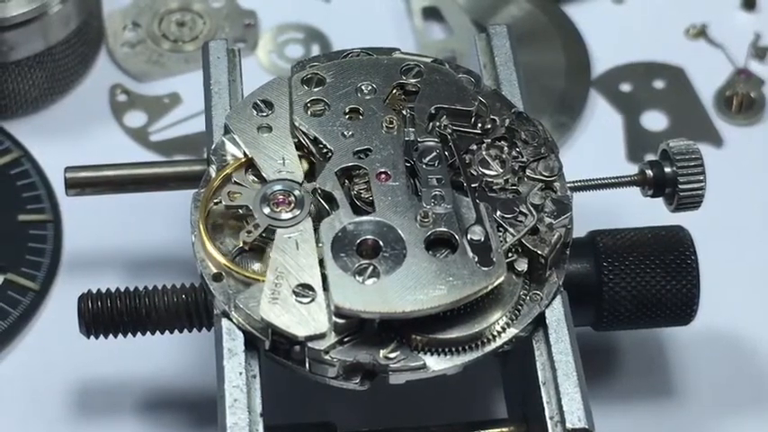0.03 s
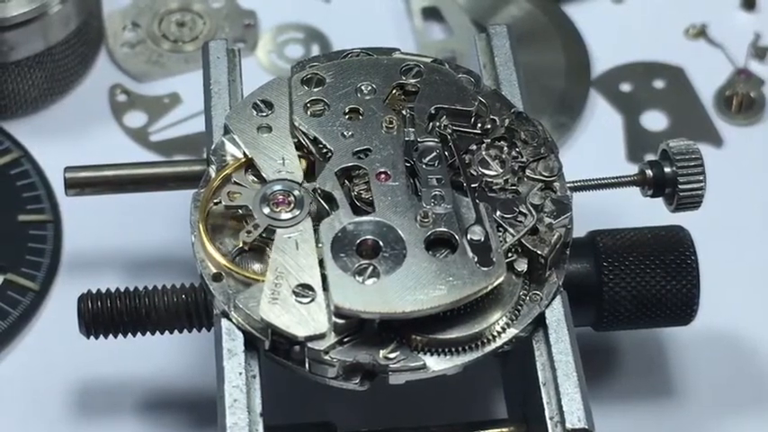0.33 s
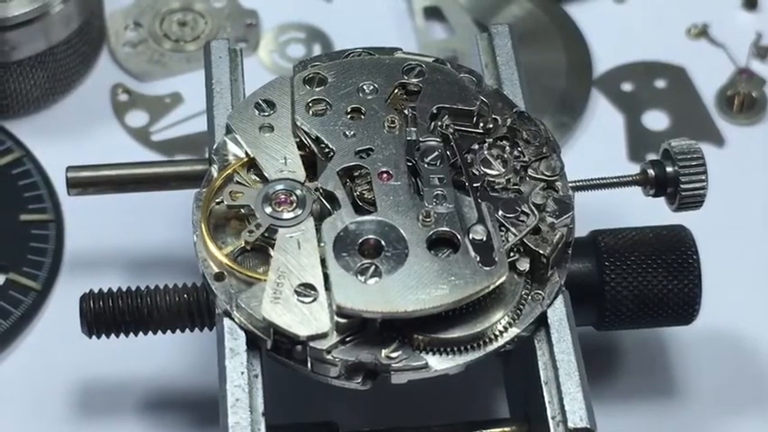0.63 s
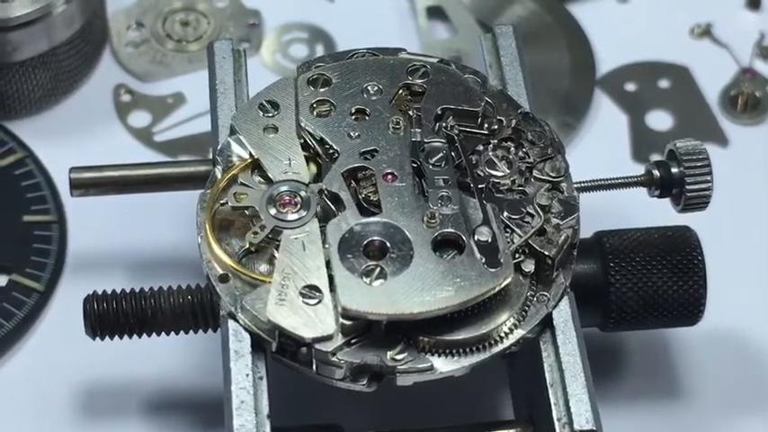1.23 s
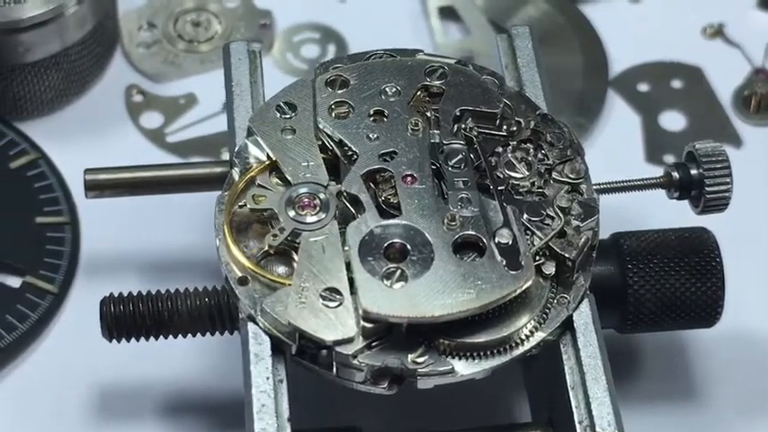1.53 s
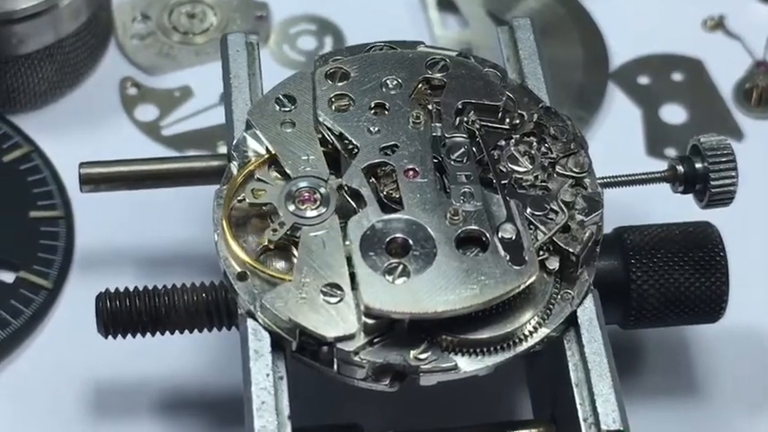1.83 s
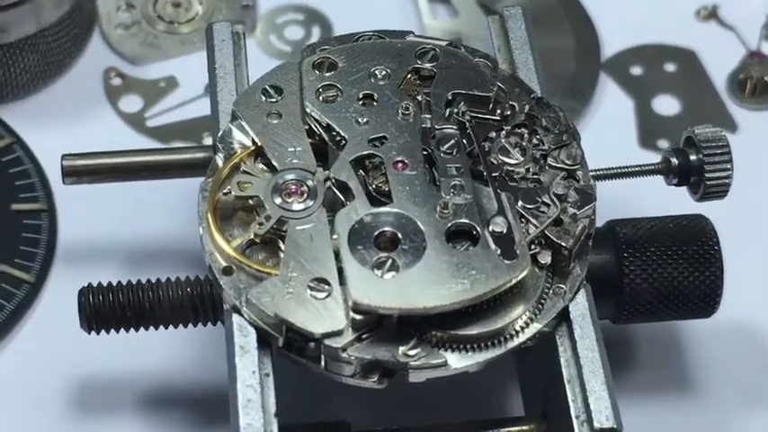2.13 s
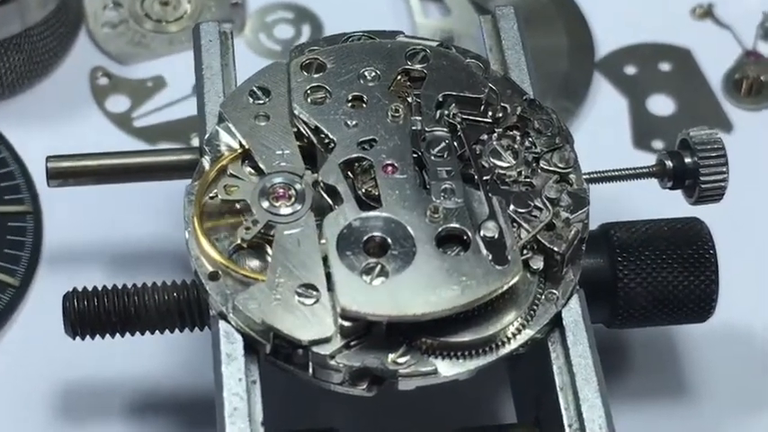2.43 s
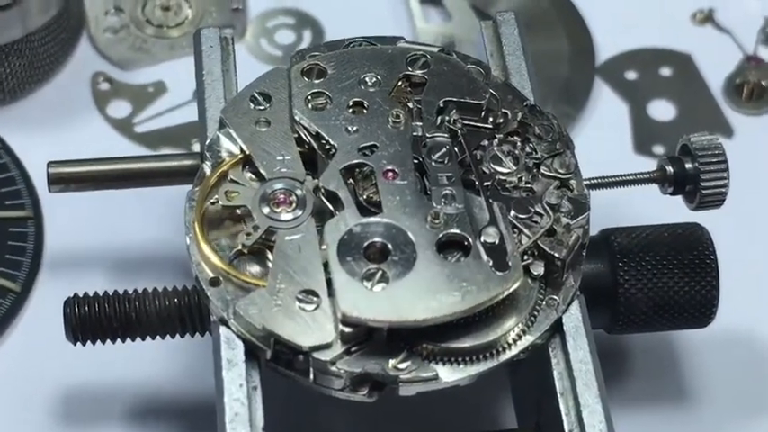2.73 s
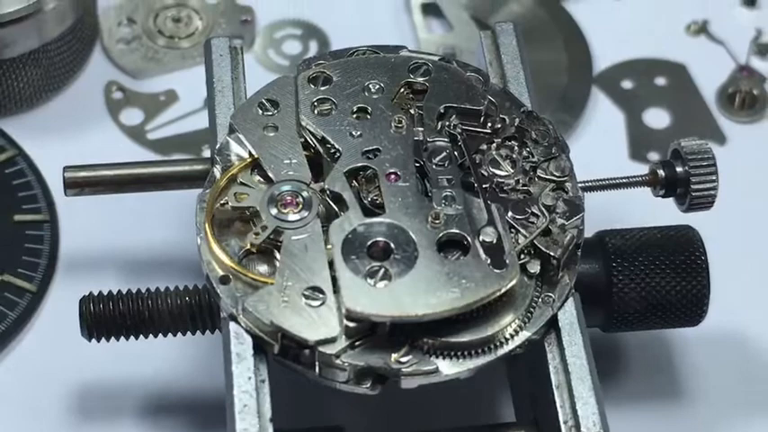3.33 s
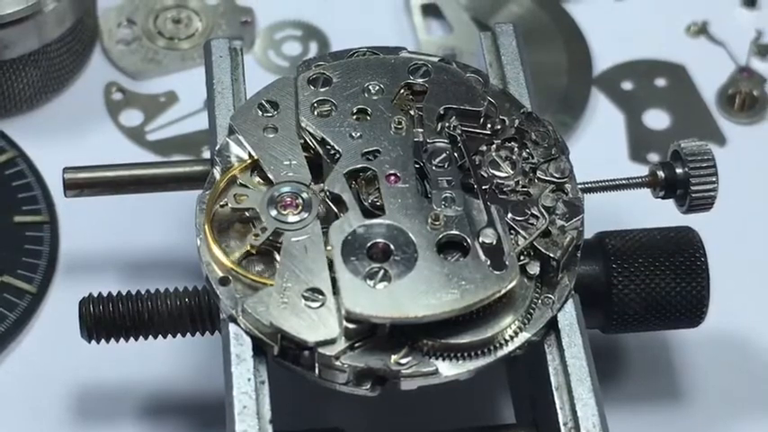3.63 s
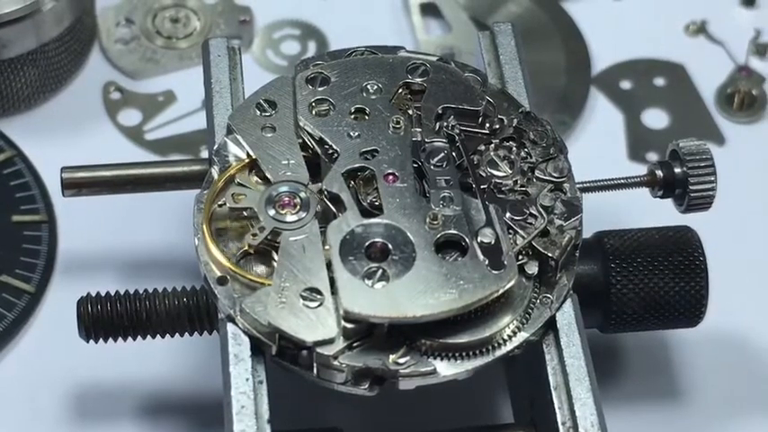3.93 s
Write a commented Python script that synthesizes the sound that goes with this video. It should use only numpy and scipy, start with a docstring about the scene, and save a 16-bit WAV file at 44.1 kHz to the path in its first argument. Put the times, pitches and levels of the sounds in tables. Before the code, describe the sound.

Tiny metallic ticks of a running mechanical watch repeat quickly and evenly throughout, close to the microphone. The quiet room adds hiss and a faint machine hum, while a deep rumble fades early and later returns.

```python
"""A bare mechanical watch movement in its holder, six beats a second, close up in a quiet room.
Each beat is a faint unlocking click, the escape wheel's drop onto a pallet and a tiny rattle.
Every contact rings the escapement and plate; the two pallets differ in colour.
Behind it a fan-like machine drones and whines faintly, and a low rumble swells over room air and hiss."""
import sys
import numpy as np
from scipy import signal
from scipy.fft import rfft, irfft
from scipy.io import wavfile

SR = 44100
rng = np.random.default_rng(int(sys.argv[2]) if len(sys.argv) > 2 else 0)


def inscribe(sig):
    """Save sig as 16-bit PCM at rate SR to the path in sys.argv[1].

    A 1-D sig is mono; a 2-D sig holds one channel per row.
    Samples are clipped to [-1, 1] before scaling.
    """
    pcm = np.round(np.clip(np.atleast_2d(sig).T, -1, 1) * 32767)
    wavfile.write(sys.argv[1], SR, pcm.astype(np.int16))


N = 176400


def from_db(db):
    """Decibels to gain."""
    return 10 ** (np.asarray(db) / 20)


def rms_one(x):
    """Scale to unit rms."""
    return x / np.sqrt(np.mean(x ** 2) + 1e-20)


def in_time(rows):
    """A control curve at every sample."""
    time_s, value = np.transpose(rows)
    return np.interp(np.arange(N) / SR, time_s, value)


def drift(rate_hz):
    """Slow random wander, unit rms."""
    pole = np.exp(-200 * np.pi * rate_hz / SR)
    noise = rng.standard_normal(N // 100 + 2002)
    slow = signal.lfilter([1], [1, -2 * pole, pole * pole], noise)[2000:]
    return np.interp(np.arange(N) / 100, np.arange(len(slow)), rms_one(slow))


def ring(clicks, hz, t60_s):
    """A unit click sets a sine of height 1 ringing."""
    radius = np.exp(-np.log(1000) / (t60_s * SR))
    angle = 2 * np.pi * hz / SR
    return signal.lfilter([0, np.sin(angle)], [1, -2 * radius * np.cos(angle), radius ** 2], clicks + 1e-18)


def tone(hz, db, waver_db, waver_hz):
    """A sine that wavers in level and pitch."""
    phase = 2 * np.pi * (np.cumsum(hz + waver_hz * drift(2.67)) / SR + rng.random())
    return from_db(db) * rms_one(np.sin(phase) * from_db(waver_db * drift(3.2)))


# Room air and hiss, cut off steeply above 15.5 kHz: frequency_hz, density_db_per_hz
AIR_SPECTRUM = [(20, -108), (35, -85), (70, -84), (140, -87), (220, -87.5), (400, -95), (470, -103),
                (750, -103), (1150, -105), (1600, -109.5), (2300, -108), (3200, -111.5), (4400, -115),
                (4900, -120), (5600, -116), (6500, -116), (7600, -119), (8600, -116.5), (9700, -116),
                (10400, -119.5), (11000, -116), (15500, -116), (16000, -135)]
# Machine resonances: centre_hz, width_hz, rms_db
DRONE_BANDS = [(41.8, 3.2, -80), (62.8, 4.7, -57.5), (86, 9.6, -67), (112.8, 8.3, -74), (189.2, 11, -69),
               (231, 10, -82), (264.6, 21, -66), (273.2, 23, -74), (345, 17, -72.5), (363, 13, -71),
               (390, 6.2, -73.5), (411.9, 7.6, -69), (684, 210, -77.5), (1050, 270, -82.5),
               (1371, 116, -82), (1827, 240, -82.5), (5560, 570, -86.5), (6480, 530, -86)]


def room_noise():
    """Air and hiss, plus resonances stirred by the machine's noise."""
    bin_hz = np.maximum(np.arange(N // 2 + 1) * SR / N, 1)
    air_hz, air_db = np.transpose(AIR_SPECTRUM)
    density = from_db(np.interp(np.log(bin_hz), np.log(air_hz), air_db)) ** 2
    for centre_hz, width_hz, rms_db in DRONE_BANDS:
        peak_density = from_db(rms_db) ** 2 * 2 * np.sqrt(2) / (np.pi * width_hz)
        density += peak_density / (1 + (2 * (bin_hz - centre_hz) / width_hz) ** 4)
    return irfft(rfft(rng.standard_normal(N)) * np.sqrt(density * SR / 2), N)


# Rumble level: time_s, level_db
RUMBLE_LEVEL = [(0.0, -51.5), (0.13, -43.5), (0.28, -45.5), (0.38, -64), (0.42, -63), (0.66, -55),
                (0.71, -48.5), (0.86, -68), (1.01, -56), (1.11, -63), (1.17, -58), (1.44, -61),
                (1.49, -55.5), (1.94, -54.5), (1.98, -62.5), (2.81, -44), (3.97, -44), (4.0, -42.5)]
# Rumble pitch: time_s, pitch_hz
RUMBLE_PITCH = [(0, 49.9), (.3, 49.72), (.6, 52.2), (1.9, 53), (2.7, 51.5), (3.2, 50.63), (4, 51.34)]


def rumble(gain_db=0.5):
    """A deep tone that fades early and swells again."""
    return tone(in_time(RUMBLE_PITCH), in_time(RUMBLE_LEVEL) + gain_db, waver_db=-2, waver_hz=0.22)


# Steady hum: pitch_hz, rms_db
HUM_TONES = [(29, -70), (174, -63.5), (200, -74.5), (300, -76)]
# Mains hum: time_s, level_db
MAINS_LEVEL = [(0.0, -72), (0.21, -62), (0.93, -66.5), (1.02, -55), (1.29, -77), (1.37, -53), (1.63, -73),
               (1.73, -58), (1.87, -58), (2.02, -75), (2.06, -60), (2.18, -55), (2.33, -68.5), (2.49, -59),
               (2.75, -66), (2.84, -61), (3.73, -62), (4.0, -65)]
# Whine: pitch_hz, level_db
WHINE_TONES = [(532.9, -84.5), (683.7, -86), (974.4, -79), (1071, -87), (1378, -92.5), (1750, -84.5),
               (1798, -80.5), (2116, -88), (2482, -88.5), (2762, -90.5), (3844, -99), (3989, -99),
               (4716, -93), (5399, -92), (5545, -90.5), (5642, -104.5), (6519, -104.5), (6568, -89),
               (6616, -94), (6665, -86.5), (6761, -100), (6907, -100), (6955, -102), (8269, -101)]


def machine_tones(mains_hz=99.05, mains_gain_db=2.5, whine_gain_db=-1):
    """Low hum and thin whine of a machine in the room."""
    hum = sum(tone(hz, db, waver_db=2, waver_hz=0.67) for hz, db in HUM_TONES)
    mains = tone(mains_hz, in_time(MAINS_LEVEL) + mains_gain_db, waver_db=1.05, waver_hz=0.66)
    whine = sum(tone(hz, db + whine_gain_db, waver_db=2, waver_hz=1.2) for hz, db in WHINE_TONES)
    return hum + mains + whine


def bench_echo(source, gain_db=-16, t60_s=0.1):
    """Short diffuse tail from the bench and walls."""
    time_s = np.arange(SR // 4) / SR
    tail = rng.standard_normal(len(time_s)) * np.exp(-np.log(1000) * time_s / t60_s)
    return from_db(gain_db) * signal.fftconvolve(source, tail / np.linalg.norm(tail))[:N]


def contacts(beats, rebounds=6, rattle_s=0.004, rattle_db=-11, fall_db_per_s=2000):
    """Contact times and levels relative to the drop, one row per beat: three blows, then a rattle."""
    rebound_s = rattle_s * (np.arange(rebounds) + rng.uniform(0.38, 1, (beats, rebounds))) / rebounds
    rebound_db = rattle_db - fall_db_per_s * rebound_s
    # unlocking, impulse, drop
    blow_s = -np.array([0.0088, 0.001, 0]) * rng.normal(1, 0.018, (beats, 3))
    blow_db = np.tile([-13, -14, 0], (beats, 1))
    return np.hstack([blow_s, rebound_s]), np.hstack([blow_db, rebound_db])


def contact_cracks(at_sample, level_db, gain_db=3.5, decay_s=0.00035, highpass_hz=8000):
    """A brief burst of bright noise at each contact."""
    blows = np.zeros(N)
    blows[at_sample] = from_db(level_db + gain_db)
    envelope = signal.lfilter([1], [1, -np.exp(-1 / (decay_s * SR))], blows + 1e-18)
    highpass = signal.butter(2, highpass_hz, "high", fs=SR, output="sos")
    return signal.sosfilt(highpass, envelope * rng.standard_normal(N))


# Beats, on alternate pallets: drop_s, high_ring_db, click_db
BEATS = [(0.0967, -65.0, -69.8), (0.2636, -61.3, -71.8), (0.4298, -64.7, -68.1), (0.5957, -62.9, -70.5),
         (0.7629, -64.9, -69.1), (0.9288, -59.5, -74.6), (1.0961, -62.3, -69.6), (1.2621, -60.5, -68.8),
         (1.4291, -68.4, -66.9), (1.5951, -62.9, -68.4), (1.7621, -61.3, -62.2), (1.9281, -55.0, -66.9),
         (2.0952, -62.5, -65.3), (2.2613, -59.4, -63.5), (2.4285, -64.0, -62.5), (2.5943, -55.0, -64.8),
         (2.7613, -60.4, -63.1), (2.927, -65.1, -66.2), (3.0944, -65.6, -64.0), (3.2608, -59.6, -68.4),
         (3.4277, -70.9, -63.3), (3.5933, -66.8, -67.5), (3.7606, -70.0, -67.3), (3.9264, -63.7, -69.3)]
# Escapement and plate modes: pitch_hz, tick_db, tock_db
WATCH_MODES = [(5500, -10, -9), (8340, -3, 1), (9400, -0.5, -1), (10000, 1, 0), (11100, 5, 6),
               (11900, -3, 4), (13300, -9, -9), (14100, 8, 7), (15100, -2, 3), (15600, -10, -8)]


def escapement(mode_gain_db=3, scatter_db=2, t60_s=0.0034, high_ring_above_hz=12500):
    """Each contact cracks and rings the same modes; the pallet struck sets their balance."""
    drop_s, high_ring_db, click_db = np.transpose(BEATS)
    offset_s, contact_db = contacts(len(BEATS))
    at_sample = np.clip(((drop_s[:, None] + offset_s) * SR).astype(int), 0, N - 1)
    watch = contact_cracks(at_sample, click_db[:, None] + contact_db)
    is_tock = np.arange(len(BEATS)) % 2
    for mode, (pitch_hz, tick_db, tock_db) in enumerate(WATCH_MODES):
        band_db = high_ring_db if pitch_hz > high_ring_above_hz else click_db
        beat_db = mode_gain_db + band_db + np.where(is_tock, tock_db, tick_db)
        strike_db = beat_db[:, None] + contact_db + scatter_db * rng.standard_normal(at_sample.shape)
        strikes = np.zeros(N)
        strikes[at_sample] = from_db(strike_db)
        watch += (-1) ** mode * ring(strikes, pitch_hz, t60_s)
    return watch


def scene():
    """The watch in front of the room's noise."""
    watch = escapement()
    return (watch + bench_echo(watch) + room_noise() + machine_tones() + rumble())[None]


def record(dry):
    """Steep low-pass."""
    cutoff_hz = 16100
    return signal.sosfilt(signal.ellip(12, 0.1, 70, cutoff_hz, fs=SR, output="sos"), dry)


dry = scene()
out = record(dry)
inscribe(out)
```